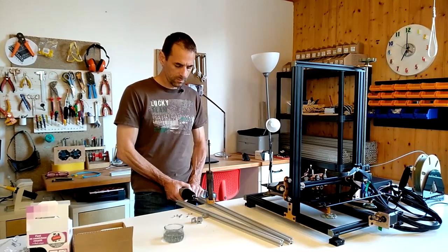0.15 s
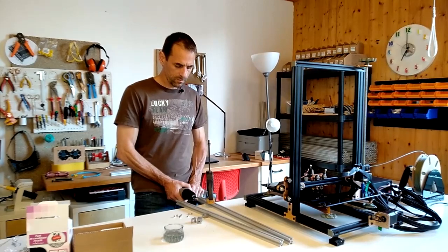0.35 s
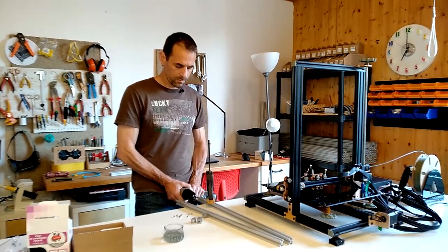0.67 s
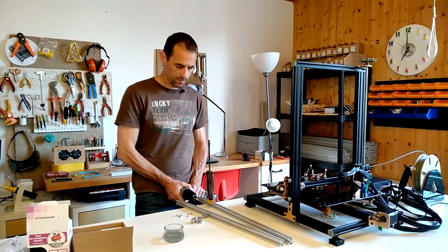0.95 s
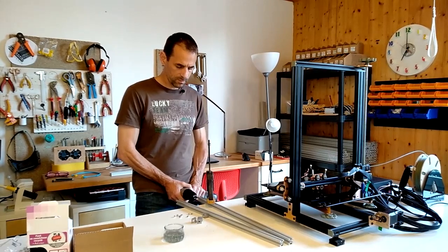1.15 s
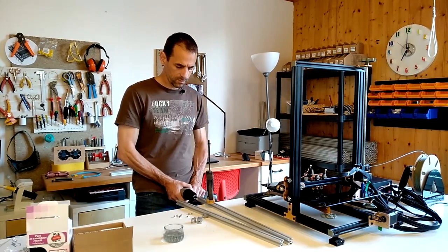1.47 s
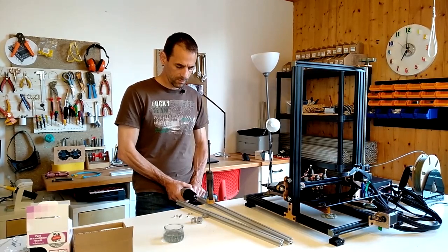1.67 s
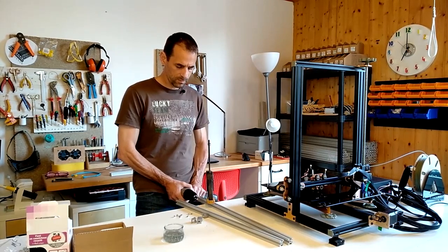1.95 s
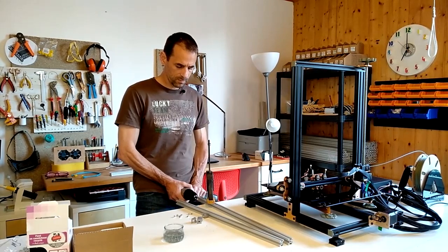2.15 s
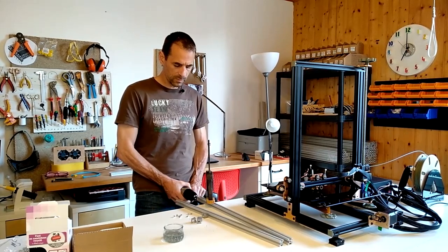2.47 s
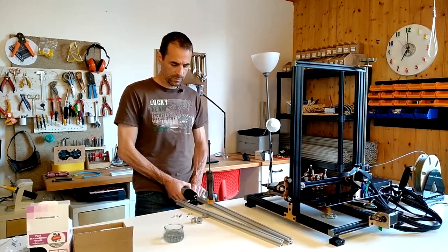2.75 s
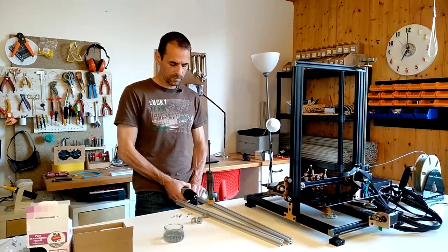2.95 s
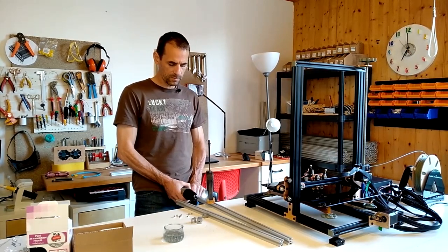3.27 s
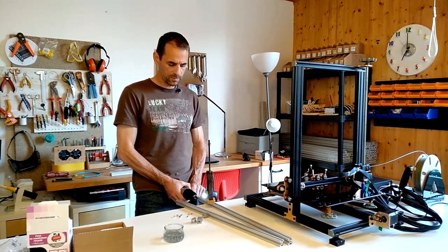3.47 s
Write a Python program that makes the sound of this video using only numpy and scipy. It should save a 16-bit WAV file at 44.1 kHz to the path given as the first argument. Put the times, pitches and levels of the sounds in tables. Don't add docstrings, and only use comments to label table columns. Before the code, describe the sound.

A cordless drill grinds slower cutting a thread, stops, clicks into reverse and whirs out faster

```python
import sys
import numpy as np
from scipy import signal
from scipy.fft import rfft, irfft
from scipy.io import wavfile
from scipy.ndimage import uniform_filter1d

SR = 44100
rng = np.random.default_rng(int(sys.argv[2]) if len(sys.argv) > 2 else 0)


def to_wav(sig):
    pcm = np.clip(np.atleast_2d(sig), -1, 1) * 32767
    pcm = np.round(pcm).astype(np.int16)
    wavfile.write(sys.argv[1], SR, pcm.T)


def gain_from_decibels(decibels):
    exponent = np.asarray(decibels, float) / 20
    return 10 ** exponent


N = 158760
T = np.arange(N) / SR


def evened(x):
    return x / np.sqrt(np.mean(x ** 2) + 1e-20)


def read(points, hz):
    f, value = np.transpose(points)
    return np.interp(np.log(hz + 1), np.log(f + 1), value)


def coloured(x, points):
    gain = gain_from_decibels(read(points, np.fft.rfftfreq(len(x), 1 / SR)))
    return evened(irfft(rfft(x) * gain, len(x)))


def high_pass(order, hz, x):
    return signal.sosfilt(signal.butter(order, hz, "high", fs=SR, output="sos"), x)


def resonate(x, hz, width_hz):
    turn = np.exp(2j * np.pi * np.cumsum(hz * np.ones(len(x))) / SR)
    r = np.exp(-np.pi * abs(width_hz) / SR)
    smooth = signal.lfilter([1], [1, -2 * r, r * r], x / turn)
    return evened((turn * smooth).real)


def drifting(samples, span):
    return evened(uniform_filter1d(rng.standard_normal(N), size=samples))[span]


def tooth_impacts(span):
    ticks_per_s, spread_db = 8000, 1.5
    hiss = rng.standard_normal(N)[span]
    struck = rng.random(N)[span] < ticks_per_s / SR
    size = np.minimum(rng.exponential(1, N)[span], 5)
    return evened(hiss * (.5 + struck * gain_from_decibels(spread_db * size)))


# (pitch [Hz], width [Hz], driving in [dB], free [dB], backing out [dB])
HOUSING = [(226, 68, -28.5, -23, -25), (272.5, 25, -27.5, -43, -43), (381, 98, -18.5, -23.5, -35),
           (827, 30, -28, -14, -26), (1110, 146, -47, -35, -22), (1540, 280, -23, -25, -30),
           (1803, 83, -23, -48, -24), (1986, 10, -60, -36, -23.5), (4177, 710, -17.5, -18, -21),
           (5030, 900, -20, -23, -22), (6100, 310, -28, -41, -20), (7254, 200, -19, -24, -30),
           (7870, 2100, -21, -18.5, -15), (11200, 400, -32, -34, -47)]


def housing_ring(teeth, way, span):
    patch_db, patch_s, wander, min_width_share = 4, .015, .02, .05
    ring = 0
    for row in HOUSING:
        hz, width_hz = row[:2]
        drift = drifting(5000, span) * (hz > 2000)
        patches = drifting(round(patch_s * SR), span)
        mode = resonate(teeth, hz * (1 + wander * drift), max(width_hz, min_width_share * hz))
        ring = ring + gain_from_decibels(row[2 + way] + patch_db * patches) * mode
    return ring


def moving_orders(teeth, speed, carrier, orders, throb_db, settle, span):
    wobble, grind_db, grind_s, grind_sway, ring_db = .018, 3.3, .014, .2, 6
    n = len(teeth)
    progress = np.minimum(np.linspace(0, 1, n) / settle, 1)
    turns = 2 * np.pi * np.cumsum(speed * (1 + wobble * drifting(400, span))) / SR
    order_throb_db = -0.5 * throb_db / 1.17 * np.cos(carrier)
    lines = 0
    for multiple, first_db, last_db, width_hz, pure in orders:
        clumps, sway = (drifting(round(grind_s * SR), span) for _ in "ab")
        tone = np.sqrt(2 * pure) * np.sin(multiple * turns)
        grind = resonate(teeth, multiple * speed + grind_sway * width_hz * sway, width_hz)
        level_db = first_db + (last_db - first_db) * progress
        level_db = level_db + grind_db * (1 - pure) * clumps + order_throb_db
        lines = lines + gain_from_decibels(level_db) * (tone + np.sqrt(1 - pure) * grind)
    hz = np.fft.rfftfreq(n, 1 / SR)
    lift = 1 + sum(gain_from_decibels(ring_db) / (1 + ((hz - row[0]) / row[1]) ** 2) for row in HOUSING[2:5])
    return irfft(rfft(lines) * lift, n)


def drill(curve, orders, body, way, throb_db, settle=1, panels=()):
    gear_ratio, throb_turn = 16.2, 0.24
    flicker_db, treble_hz = .5, 3050
    coast_hz, coast_dull = 380, 2.1
    s, speed_hz, effort_db = np.transpose(curve)
    span = slice(max(round(s[0] * SR), 0), min(round(s[-1] * SR), N))
    t = T[span]
    speed = uniform_filter1d(np.interp(t, s, speed_hz), size=600)
    carrier = 2 * np.pi * (np.cumsum(speed) / SR / gear_ratio + throb_turn)
    teeth = tooth_impacts(span)
    sound = coloured(teeth, body) + housing_ring(teeth, way, span)
    for hz, width_hz, at_hz, reach_hz, db in panels:
        near = np.exp(-((speed - at_hz) / reach_hz) ** 2)
        sound = sound + near * gain_from_decibels(db - 0.5 * np.cos(carrier)) * resonate(teeth, hz, width_hz)
    sound = sound + moving_orders(teeth, speed, carrier, orders, throb_db, settle, span)
    treble = signal.sosfiltfilt(signal.butter(2, treble_hz, "high", fs=SR, output="sos"), sound)
    sound = sound - treble * (1 - np.minimum(speed / coast_hz, 1) ** coast_dull)
    level_db = np.interp(t, s, effort_db) + throb_db * np.cos(carrier) + flicker_db * drifting(400, span)
    out = np.zeros(N)
    out[span] = evened(sound) * gain_from_decibels(level_db)
    return out


# (time [s], motor speed [Hz], effort [dB])
FORWARD = [(0, 516, -23), (.25, 466.5, -24), (.5, 432.5, -24.5), (.75, 398.4, -23.5), (1.2, 375.4, -24.5),
           (1.7, 375.2, -24), (2.105, 364, -23.5), (2.13, 319, -30), (2.19, 237, -40), (2.26, 147, -58),
           (2.38, 70, -64)]
# (multiple of speed, start [dB], end [dB], width [Hz], pure share [0-1])
FORWARD_ORDERS = [(1, -12, -34, 40, .5), (1.76, -24, -19, 185, 0.1), (2.98, -19, -15.5, 390, 0.05),
                  (6.45, -16, -32, 150, .3)]
# (frequency [Hz], level [dB])
FORWARD_BODY = [(88, -60), (150, -16), (373, -2), (500, -2), (643, -0.5), (1110, 0.5), (3100, -10),
                (7410, -6.5), (15500, -31)]
# (pitch [Hz], width [Hz], motor speed [Hz], speed range [Hz], level [dB])
SINGING_PANELS = [(825, 22, 448, 40, -13), (385, 30, 425, 45, -15)]


def driving_in():
    return drill(FORWARD, FORWARD_ORDERS, FORWARD_BODY, way=0, throb_db=1.17, settle=.4,
                 panels=SINGING_PANELS)


# (time [s], motor speed [Hz], effort [dB])
FREE = [(2.645, 529, -63), (2.665, 535, -56), (2.685, 520.4, -28.5), (2.765, 531.7, -32),
        (2.81, 585.5, -31), (2.86, 644, -29), (2.94, 707.4, -30), (3.03, 695, -27), (3.065, 547, -38)]
# (multiple of speed, start [dB], end [dB], width [Hz], pure share [0-1])
FREE_ORDERS = [(.41, -10, -30, 25, .3), (.49, -36, -22, 40, .1), (1, -15, -16, 45, .5),
               (1.47, -12, -13, 90, .5), (6.25, -25, -13, 130, .1)]
# (frequency [Hz], level [dB])
FREE_BODY = [(88, -53), (150, -40), (268, -41), (428, -9.5), (1000, -3), (3220, -18), (8010, -13.5),
             (12000, -33.5), (15500, -37)]


def reversing_free():
    return drill(FREE, FREE_ORDERS, FREE_BODY, way=1, throb_db=.6)


# (time [s], motor speed [Hz], effort [dB])
BACK = [(3.035, 440, -50), (3.05, 470, -27), (3.072, 525, -26), (3.1, 578, -25.5), (3.14, 622, -24.5),
        (3.3, 635, -23.5), (3.45, 654, -24.3), (3.61, 672, -24)]
# (multiple of speed, start [dB], end [dB], width [Hz], pure share [0-1])
BACK_ORDERS = [(.33, -30, -27, 25, .2), (.85, -24, -20, 70, 0), (1, -8, -11, 35, .85),
               (6.15, -34, -14, 220, .15), (12.3, -22, -17, 600, 0)]
# (frequency [Hz], level [dB])
BACK_BODY = [(88, -58), (150, -24), (201, -30), (420, -11), (643, -8.5), (722, -5.5), (3160, -14),
             (7710, -7), (15500, -36)]


def backing_out():
    return drill(BACK, BACK_ORDERS, BACK_BODY, way=2, throb_db=.4, settle=.2)


# (time [s], peak [dB], brightness [0-1],
# length [s])
CLICKS = [(2.147, -28, .45, .0015), (2.187, -33, .9, .0015), (2.229, -37, .45, .0015),
          (2.284, -46, .5, .0015), (2.314, -47, .8, .001), (2.334, -50, .6, .0015), (2.3595, -50, .1, .002),
          (2.373, -46, .95, .001), (2.392, -50, .1, .003), (2.4098, -16, .6, .0015),
          (2.4122, -9, .7, .0015), (2.6185, -43, .4, .002), (2.633, -38, .75, .002),
          (2.6455, -35, .65, .002), (2.659, -35, .9, .003), (2.668, -24, .1, .004), (2.6787, -9, .85, .002),
          (2.685, -24, .8, .001), (2.7036, -8, .75, .0018)]
# (frequency [Hz], level [dB])
SNAP_DULL = [(150, -40), (300, -18), (550, 0), (1200, -3), (3000, -16), (12000, -40)]
# (frequency [Hz], level [dB])
SNAP_BRIGHT = [(500, -59), (3500, -0.5), (5500, -4), (7600, 7), (10500, -14.5), (13500, -30), (16000, -22)]


def clicks():
    near, far = np.zeros(N), np.zeros(N)
    t = np.arange(1024) / SR
    pulse = 1. * (np.arange(1024) == 512)
    for s, db, bright, length_s in CLICKS:
        burst, knock = ((1 - bright) * coloured(x, SNAP_DULL) + bright * coloured(x, SNAP_BRIGHT)
                        for x in (rng.standard_normal(1024), pulse))
        burst = burst * np.minimum(t / 0.00026, 1) * np.exp(-t / length_s)
        burst = gain_from_decibels(db) * burst / abs(burst).max()
        near[round(s * SR):][:1024] += burst
        far[round(s * SR) - 512:][:1024] += knock * np.linalg.norm(burst) / np.linalg.norm(knock)
    return high_pass(2, 300, [near, far])


# (start [s], end [s], pitch [Hz], level [dB])
WHINE = (2.659, 2.671, 3800, -45)


def whine():
    start_s, end_s, hz, db = WHINE
    gate = np.clip(np.minimum(T - start_s, end_s - T) / 0.003, 0, 1)
    return gain_from_decibels(db) * gate * resonate(rng.standard_normal(N), hz, 195)


# (time [s], pitch [Hz], peak [dB])
PINGS = [
    (2.154, 4070, -36),
    (2.238, 4250, -37),
    (2.238, 7350, -46),
    (2.355, 7700, -55),
]


def pings():
    t60_s, attack_s = 0.022, .0015
    out, t = np.zeros(N), np.arange(2048) / SR
    for s, hz, db in PINGS:
        envelope = gain_from_decibels(db - 60 * t / t60_s) * np.minimum(t / attack_s, 1)
        out[round(s * SR):][:2048] += envelope * np.sin(2 * np.pi * hz * t)
    return out


# (frequency [Hz], T60 [s])
ROOM_T60 = [(200, 0.32), (1000, 0.4), (4000, 0.4), (8000, 0.38), (10500, 0.33), (13000, 0.56)]


def room(x):
    at, taps = np.arange(200, SR // 2, 20), np.zeros(SR // 2 + 20)
    taps[at + rng.integers(0, 20, len(at))] = rng.choice([-1., 1.], len(at))
    hz, t, z = signal.stft(taps, SR, nperseg=256)
    decay = gain_from_decibels(-60 * t / read(ROOM_T60, hz)[:, None])
    tail = signal.istft(z * decay, SR, nperseg=256)[1]
    return signal.fftconvolve(x, tail / np.linalg.norm(tail))[:N]


# (frequency [Hz], level [dB])
FLOOR = [(59, -47), (100, -10), (262, -5), (2470, -16), (7510, -25.5), (12200, -32), (15000, -21)]


def workshop_floor():
    return gain_from_decibels(-61) * coloured(rng.standard_normal(N), FLOOR)


def scene():
    motor = driving_in() + reversing_free() + backing_out() + whine() + pings()
    near, far = clicks()
    wet = room(gain_from_decibels(-9) * motor + gain_from_decibels(-6.5) * far)
    return (motor + near + wet + workshop_floor())[None]


def band_limit(x):
    return signal.sosfilt(signal.butter(12, 15790, fs=SR, output="sos"), x)


# (frequency [Hz], level [dB])
MICROPHONE = [(12700, 1), (13300, -7), (16000, -14.5)]


def record(dry):
    low_cut_hz, ceiling, rumble_db = 174, .32, -55
    cut = high_pass(6, low_cut_hz, dry)
    cut = irfft(rfft(cut) * gain_from_decibels(read(MICROPHONE, np.fft.rfftfreq(N, 1 / SR))), N)
    held = cut / (1 + (abs(cut) / ceiling) ** 4) ** .25
    held = high_pass(4, 130, held)
    running = np.sqrt(abs(uniform_filter1d(dry ** 2, size=2000)))
    rumble = coloured(rng.standard_normal(N), [(20, -24), (60, -25), (120, 6), (300, -11)])
    return band_limit(held + gain_from_decibels(rumble_db) * running * rumble)


dry = scene()
out = record(dry)
to_wav(out)
```